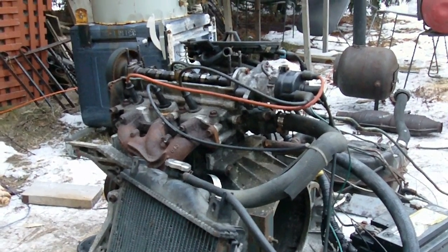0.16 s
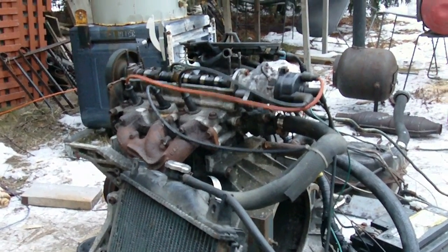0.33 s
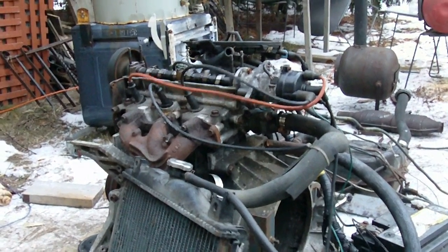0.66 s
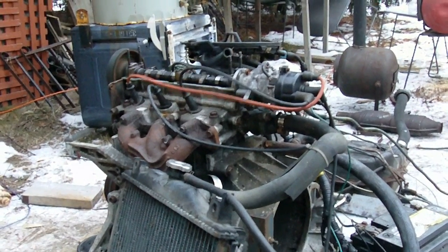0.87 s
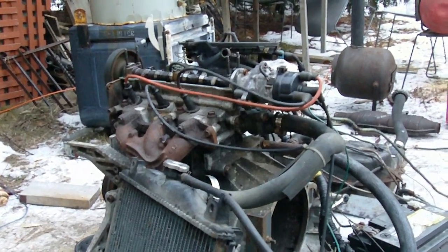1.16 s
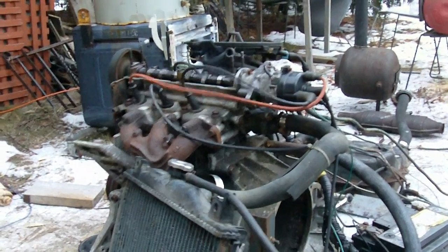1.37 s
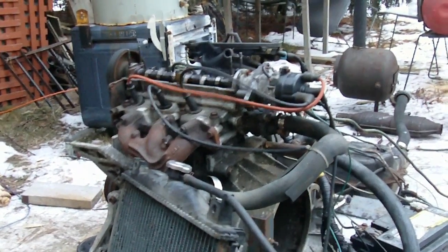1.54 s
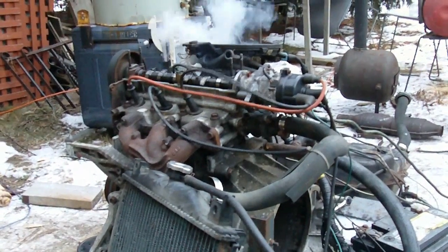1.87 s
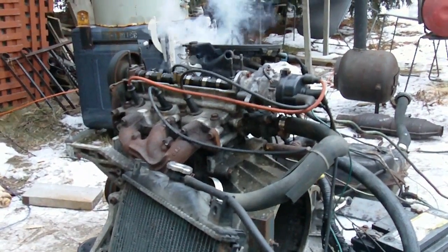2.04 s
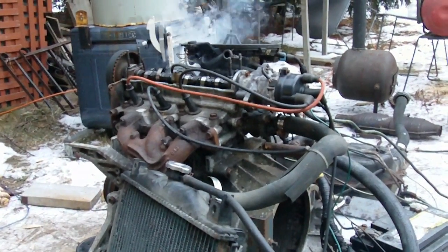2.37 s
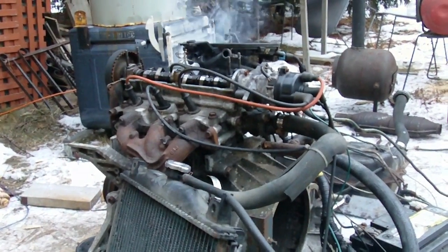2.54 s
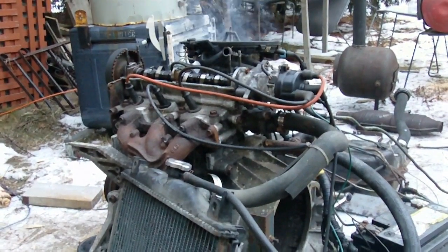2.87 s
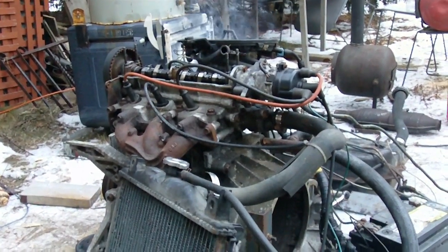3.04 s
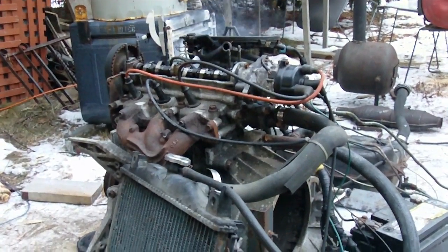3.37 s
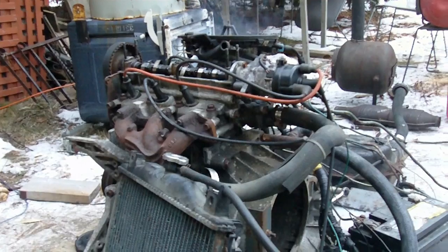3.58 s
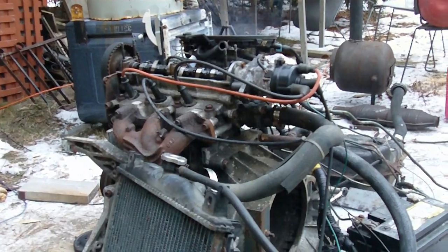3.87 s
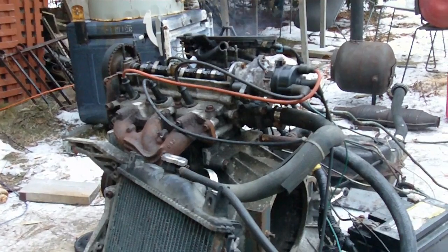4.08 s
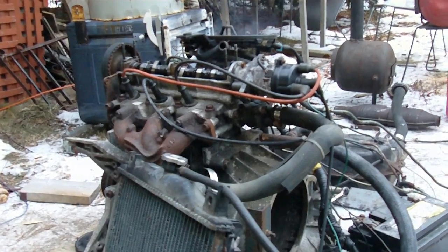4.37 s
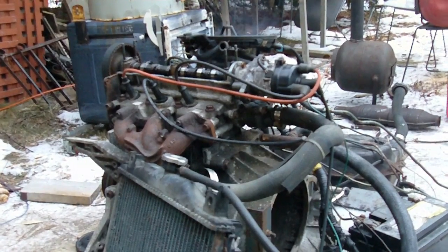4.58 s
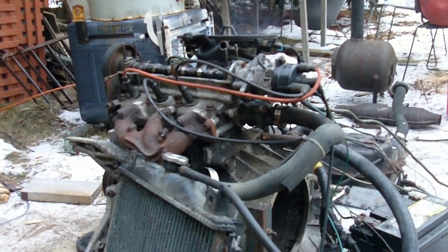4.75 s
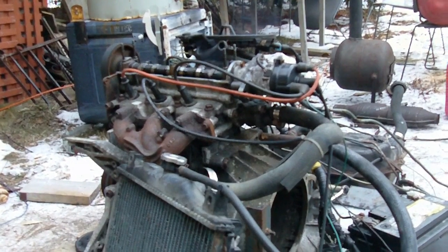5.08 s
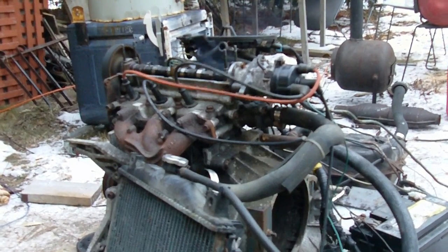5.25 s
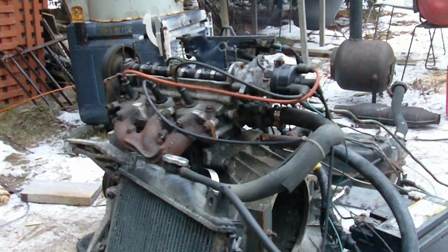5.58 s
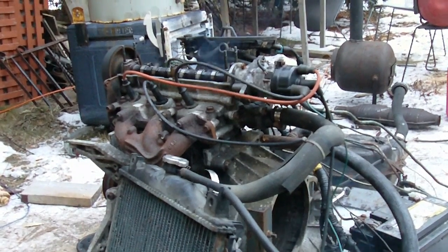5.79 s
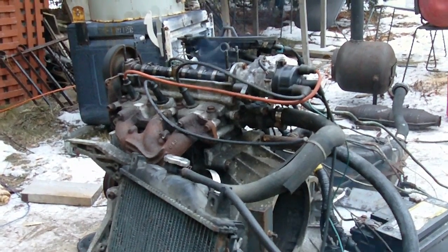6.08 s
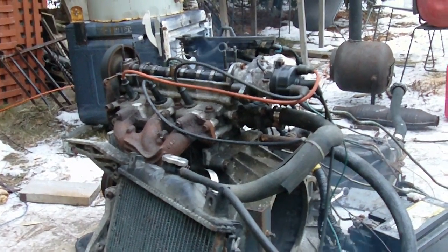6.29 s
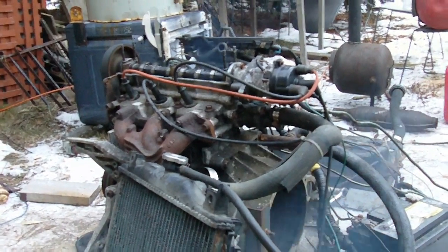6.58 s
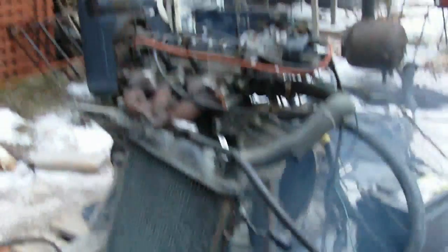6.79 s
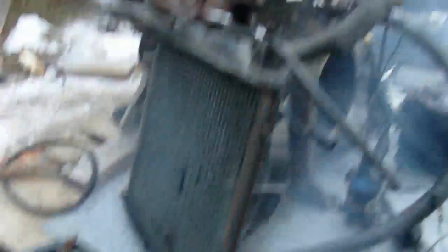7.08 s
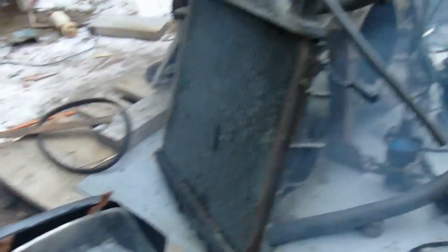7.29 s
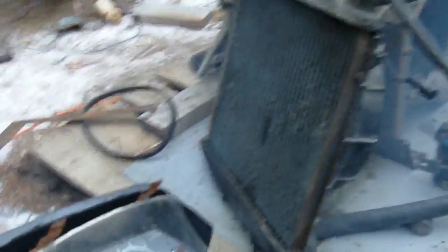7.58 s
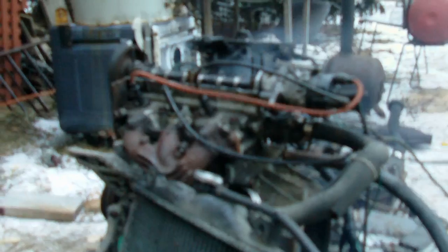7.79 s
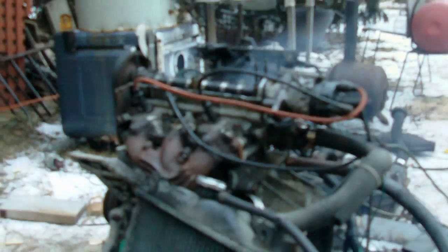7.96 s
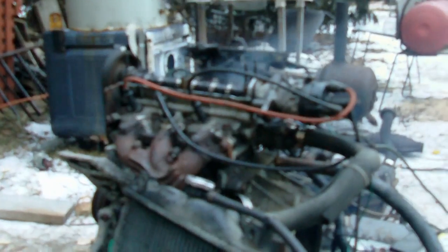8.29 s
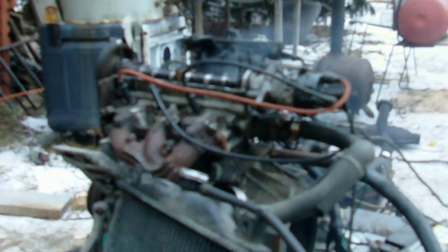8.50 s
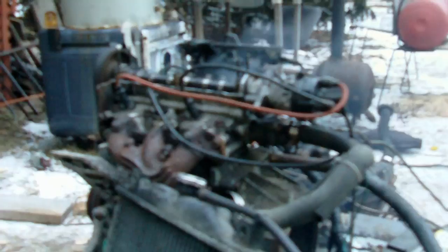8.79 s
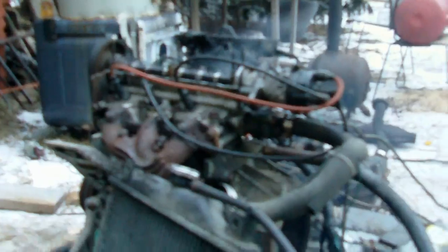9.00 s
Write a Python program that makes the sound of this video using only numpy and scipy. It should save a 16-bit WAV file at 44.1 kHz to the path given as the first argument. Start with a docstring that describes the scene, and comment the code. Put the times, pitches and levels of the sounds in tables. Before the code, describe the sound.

Close by in a quiet yard, an exposed engine is cranked: gears grind, and each slow chug lands with a loud metal clack. The first attempt fails and the starter whirs down to near silence, with a single click. The starter bites again, the chugs quicken and the engine fires, climbing with puffing exhaust and ticking valves. The tone then changes abruptly to a fast, even, clattering idle, as if heard from its other side.

```python
"""A snowy yard, where an open six-cylinder engine is being started. The starter's gears grind and growl,
single cylinders clack and gulp, the engine stalls and the starter spins down. A second try catches and
climbs; from SHIFT_S on it idles faster, heard from another side. Gears and clacks are noise through metal
resonances, the exhaust is a train of puffs coloured by the pipe, and valves tick and ring on every turn.
The sheds throw back a short echo."""
import sys
import numpy as np
from scipy import signal
from scipy.fft import rfft, irfft, next_fast_len
from scipy.io import wavfile
from scipy.ndimage import uniform_filter1d, map_coordinates

SR = 44100
rng = np.random.default_rng(int(sys.argv[2]) if len(sys.argv) > 2 else 0)


def store_pcm(level_fs):
    """Save levels as 16-bit WAV."""
    pcm = np.round(np.clip(level_fs, -1, 1) * 32767).astype(np.int16)
    wavfile.write(sys.argv[1], SR, np.atleast_2d(pcm).T)


N = 402633
T = np.arange(N) / SR
STALL_S, STOP_S, RETRY_S, CATCH_S, SHIFT_S = 1.85, 3.6, 4.538, 6.0, 7.755
SECOND_AT = .32  # the next cylinder follows after this share of the gap between chugs

# flutter of the passing gear teeth: time_s, rate_hz, depth_db
TOOTH_FLUTTER = [(0, 70, .5), (1.85, 65, .5), (2, 65, 1.5), (2.5, 60, 1), (3, 40, 1.5), (3.5, 18, 2.5),
                 (4.5, 70, .5), (9.13, 70, 0)]
# the pinion bites the ring gear: start_s, click_db, grind_db, hiss_db
PINION_BITES = [(.3012, -8, -31, -27), (.5152, -11.5, -33.5, -31.5), (.5576, -15.5, -38, -25.5),
                (.7243, -12, -31, -26.5), (.9004, -14, -32.5, -28.5), (1.0859, -15.5, -43, -31.5),
                (1.2565, -12.5, -40, -28.5), (1.4217, -16, -35, -31), (4.7543, -10.5, -31, -30),
                (4.7729, -10, -36, -23.5), (4.8785, -11.5, -33, -30), (5.0401, -14, -32.5, -35),
                (5.1444, -19, -29, -30.5), (5.2142, -11, -32.5, -25), (5.385, -18, -39, -29),
                (5.53, -22.5, -51, -31), (5.6477, -26.5, -48, -31.5), (5.763, -14, -37, -30)]
# crank position as the engine climbs: time_s, firings_so_far
CLIMB_CRANK = [(6, 4.4), (6.058, 6.45), (6.2, 11.85), (6.3434, 17.85), (6.4788, 23.93), (6.6094, 29.98),
               (6.8591, 42), (7.0975, 54), (7.3301, 66), (7.5588, 78), (7.76, 88.65)]
# resonances of the starter, the engine block and its other side: pitch_hz, width_hz, level_db
STARTER_MODES = [(924, 40, -8.5), (1192, 37, -7.5), (1370, 150, 3.5), (1845, 55, -3), (3110, 68, -5),
                 (4530, 220, -5), (5230, 50, -1), (5830, 42, 1.5), (8600, 41, 4.5), (9400, 120, -2.5)]
BLOCK_MODES = [(1030, 140, 9.5), (3003, 68, 2), (3530, 150, -4), (4330, 47, -3.5), (5030, 470, 1),
               (5610, 65, 2), (6330, 120, -5.5), (7470, 410, -13.5), (8830, 540, -11.5)]
FLANK_MODES = [(990, 54, -14), (2240, 60, 1), (2737, 150, -1.5), (3460, 510, 2), (4280, 320, -1.5),
               (5910, 430, -5.5), (6270, 54, -15.5), (7320, 160, -6), (8760, 640, -5)]
# broad tone of the same three bodies: frequency_hz, level_db
STARTER_EQ = [(35, -46.5), (60, -27.5), (300, -20.5), (500, -11.5), (900, -6.5), (1400, -16.5), (2300, -10),
              (4000, -9), (8700, -7), (16000, -21)]
BLOCK_EQ = [(240, -9.5), (400, -16.5), (666, 0.5), (852, -16), (1070, -11), (1560, -5), (3020, 2.5),
            (6950, 0.5), (8760, 5.5), (16000, -5)]
FLANK_EQ = [(240, -14), (400, -1.5), (789, -11.5), (994, -2.5), (1630, -5), (2710, -5), (3930, -9),
            (4310, -5.5), (8760, -7), (16000, -13.5)]


def amp(db):
    """dB to gain."""
    return 10 ** (np.asarray(db) / 20)


def unit(x):
    """Scale to rms 1."""
    return x / np.sqrt(np.mean(x ** 2) + 1e-20)


def curves(rows):
    """One automation curve for each column after the time."""
    times, *columns = np.transpose(rows)
    return [np.interp(T, times, column) for column in columns]


def during(start_s, end_s, fade_s=.01):
    """A gate with soft edges."""
    return np.clip((T - start_s) / fade_s, 0, 1) * np.clip((end_s - T) / fade_s, 0, 1)


def wobble(rate_hz):
    """A smooth random curve."""
    return map_coordinates(rng.standard_normal(int(N * rate_hz / SR) + 4), [T * rate_hz])


def filtered(x, response):
    """Pass x through a complex frequency response."""
    size = next_fast_len(N + SR // 2)
    return irfft(rfft(x, size) * response(np.fft.rfftfreq(size, 1 / SR)), size)[..., :N]


def noise(response):
    """Filtered white noise."""
    return filtered(rng.standard_normal(N), response)


def colour(points):
    """An EQ curve through (Hz, dB) points on a log axis."""
    points_hz, db = np.transpose(points)
    return lambda hz: amp(np.interp(np.log(hz + 1), np.log(points_hz + 1), db))


def metal(eq, modes, ring_db):
    """A metal body: broad EQ with ringing modes on top, at unity power gain."""
    def response(hz):
        ringing = sum(amp(db + ring_db) * 1j * hz * width / (pitch ** 2 - hz ** 2 + 1j * hz * width + 1)
                      for pitch, width, db in modes)
        gain = colour(eq)(hz) * (1 + ringing)
        return gain / np.sqrt(np.mean(np.abs(gain) ** 2))
    return response


def split(x, crossover_hz=2700):
    """Low and high band of a sound."""
    low = filtered(x, lambda hz: 1 / (1 + (hz / crossover_hz) ** 6))
    return low, x - low


def patchy(x, depth_db):
    """Random gain in patches some 500 Hz by 15 ms: no two blows ring alike."""
    spectrum = signal.stft(x, nperseg=256)[2]
    patches = uniform_filter1d(rng.standard_normal(spectrum.shape), size=3, axis=0)
    patches = uniform_filter1d(patches, size=5, axis=1)
    return signal.istft(spectrum * amp(depth_db * unit(patches)), nperseg=256)[1][:N]


def hump(t, rise_s, fall_s, tail_db, t60_s):
    """A rounded envelope that peaks at t = 0 and leaves a tail."""
    top = np.exp(-(t / np.where(t < 0, rise_s, fall_s)) ** 2)
    return np.where(t < 0, top * (1 + amp(tail_db)), top + amp(tail_db - 60 * np.abs(t) / t60_s))


def beats(cycles, on, pattern_db, scatter_db, jitter_s):
    """One uneven impulse each time cycles passes a whole number."""
    at = np.flatnonzero(np.diff(np.floor(cycles)) * on[1:])
    size_draw, time_draw = rng.standard_normal((len(at), 2)).T
    db = np.take(pattern_db, cycles[at + 1].astype(int), mode="wrap") + scatter_db * size_draw
    at = np.clip(at + (jitter_s * SR * time_draw).astype(int), 0, N - 1)
    return np.bincount(at, amp(db), N)


def yard(level_db=-69.5):
    """The quiet noise floor of the yard."""
    # tone of the ambience: frequency_hz, level_db
    yard_eq = [(15, -35), (30, -15), (100, -13), (180, -8.5), (260, -4.5), (400, -5.5), (800, -4.5),
               (2000, -6), (11000, -9.5), (16000, -9.5)]
    return amp(level_db) * unit(noise(colour(yard_eq)))


def shed_echo(near, level_db=-15.5, t60_s=.11):
    """A short diffuse reflection off the sheds."""
    t = np.arange(SR // 3) / SR
    tail = unit(rng.standard_normal(len(t)) * amp(-60 * t / t60_s)) / np.sqrt(len(t))
    return amp(level_db) * signal.fftconvolve(near, tail)[:N]


def hum(pitch_hz=71.8, partial_db=-91, switch_off_s=3.86):
    """Faint electric hum, harmonics 3 to 6, from the stall until the switch clicks."""
    partials = sum(np.sin(2 * np.pi * k * pitch_hz * T) for k in range(3, 7))
    return during(STALL_S, switch_off_s) * amp(partial_db) * np.sqrt(2) * partials


def buzz(pitch_hz=1390, width_hz=190):
    """While the starter coasts, each passing tooth shakes a loose part with one narrow resonance."""
    # swell of the loose part: time_s, level_db
    swell = [(1.9, -79), (1.97, -56), (2.2, -49), (2.3, -53), (2.45, -49), (2.47, -54)]
    rate_hz, _ = curves(TOOTH_FLUTTER)
    shake = amp(7.7 * np.sin(2 * np.pi * np.cumsum(rate_hz) / SR) + 1.8 * wobble(25))
    band = lambda hz: (1j * hz * width_hz / (pitch_hz ** 2 - hz ** 2 + 1j * hz * width_hz)) ** 2
    ring = filtered(shake * rng.standard_normal(N), band)
    return during(swell[0][0], swell[-1][0]) * amp(curves(swell)[0]) * unit(ring)


def growl():
    """The pinion strains against compression: each tooth strikes the starter's body at a wavering rate."""
    # strain on the pinion, one list a try: time_s, tooth_rate_hz, level_db
    strains = [
        [(.1, 420, -50), (.15, 460, -36), (.2, 420, -33), (.24, 500, -39), (.28, 330, -53)],
        [(4.6, 390, -48), (4.67, 455, -34), (4.73, 490, -44), (4.81, 460, -26), (4.84, 460, -36),
         (4.88, 460, -46)],
    ]
    body = metal(STARTER_EQ, STARTER_MODES, ring_db=9)
    out = np.zeros(N)
    for rows in strains:
        rate_hz, db = curves(rows)
        teeth = np.cumsum(rate_hz * (1 + .015 * wobble(60))) / SR
        on = (T > rows[0][0]) & (T < rows[-1][0])
        strikes = beats(teeth, on, [0], scatter_db=2, jitter_s=.00004)
        ring = filtered(strikes, lambda hz: body(hz) / (1 + (hz / 3600) ** 4))
        out += on * amp(db) * ring / np.std(ring[on])
    return out


def starter_load(rise_s=.012, grind_fall_db_per_s=174.5, hiss_fall_db_per_s=111.5):
    """Gains of grind and hiss while cranking: the load plus a short surge after every pinion bite."""
    # the starter under load, one list a try: time_s, grind_db, hiss_db
    loads = [
        [(0, -36, -29), (.05, -28, -38.5), (.09, -40.5, -33), (.2, -34, -26.5), (.25, -28, -32),
         (.3, -43, -30.5), (.5, -46, -37.5), (1, -47, -36), (1.5, -48, -43), (1.9, -47, -42.5)],
        [(4.535, -33, -24.5), (4.6, -32, -34.5), (4.67, -32, -28), (4.75, -39, -30.5), (4.82, -23, -24),
         (4.87, -32.5, -31.5), (4.91, -36, -22.5), (4.97, -43.5, -40), (5.1, -46, -34.5), (5.5, -44, -34.5),
         (5.84, -41, -30.5), (5.88, -42.5, -48.5), (6.05, -45, -33)],
    ]
    first_try, second_try = map(curves, loads)
    power = amp(np.where(T < STOP_S, first_try, second_try)) ** 2
    t = np.arange(SR // 4) / SR
    for start_s, _, grind_db, hiss_db in PINION_BITES:
        decay = amp([grind_db - grind_fall_db_per_s * t, hiss_db - hiss_fall_db_per_s * t])
        power[:, round(start_s * SR):][:, :len(t)] += (np.clip(t / rise_s, 0, 1) * decay) ** 2
    return np.sqrt(power)


def whirr():
    """Starter gears grind under load and hiss while coasting; then the engine's rush takes over."""
    # resonances of the coasting starter: pitch_hz, width_hz, level_db
    coast_modes = [(910, 37, -6.5), (1430, 110, -5.5), (1850, 55, -5.5), (2274, 67, -9.5), (3170, 90, -8.5),
                   (5040, 41, -1.5), (5260, 40, 2), (6170, 98, -6.5), (7550, 110, -2.5), (8580, 190, -4),
                   (9410, 180, -3), (10500, 98, -0.5), (12140, 280, -10.5)]
    # its broad tone: frequency_hz, level_db
    coast_eq = [(35, -55), (60, -27), (400, -22), (900, -16.5), (2000, -18.5), (3900, -10.5), (4500, -6),
                (5600, -7), (9350, -7.5), (16000, -20)]
    # fade of the coasting starter, and rush of the running engine: time_s, low_db, high_db
    spin_down = [(1.8, -50.5, -44.5), (2.1, -49.5, -44.5), (2.45, -48.5, -40), (2.5, -52.5, -40),
                 (2.9, -54.5, -44.5), (3.1, -57, -48), (3.35, -65, -56.5), (3.46, -69, -63),
                 (3.5, -75, -72)]
    rush = [(6, -39, -41), (6.7, -37.5, -37.5), (7, -33, -34), (7.7, -40, -41.5), (7.76, -35.5, -33),
            (8.8, -38.5, -36), (9.13, -33, -30.5)]
    cranking = during(-1, STALL_S + .05, .1) + during(RETRY_S, CATCH_S + .05, .003)
    coasting = during(STALL_S - .05, STOP_S, .1)
    climbing, idling = during(CATCH_S, SHIFT_S + .01), during(SHIFT_S, 10)
    stages = [(cranking, metal(STARTER_EQ, STARTER_MODES, ring_db=8), starter_load(), 2.5),
              (coasting, metal(coast_eq, coast_modes, ring_db=6.5), amp(curves(spin_down)), 1.2),
              (climbing, metal(BLOCK_EQ, BLOCK_MODES, ring_db=1.5), amp(curves(rush)), 2.5),
              (idling, metal(FLANK_EQ, FLANK_MODES, ring_db=-1.3), amp(curves(rush)), 2.2)]
    out = np.zeros(N)
    for on, body, (low_gain, high_gain), patch_db in stages:
        low, high = split(patchy(noise(body), patch_db))
        shake = amp(.43 * patch_db * wobble(55))
        grind = unit(low) * low_gain * amp(1.3 * wobble(40))
        out += on * shake * (grind + unit(high) * high_gain)
    rate_hz, depth_db = curves(TOOTH_FLUTTER)
    return out * amp(depth_db * np.sin(2 * np.pi * np.cumsum(rate_hz) / SR))


def pings(attack_s=.003):
    """Single parts ring on after a blow, each at one pitch with a flickering level."""
    # struck parts: start_s, level_db, pitch_hz, t60_s
    strikes = [(.048, -27, 5945, 0.28), (.116, -29.5, 6000, 0.33), (.14, -28, 3100, 0.22),
               (.727, -28.5, 5945, .15), (1.672, -32.5, 2010, 0.11), (6.034, -27, 2600, .1),
               (6.058, -15, 2010, 0.08)]
    out, t = np.zeros(N + SR), np.arange(SR // 4) / SR
    for start_s, db, pitch_hz, t60_s in strikes:
        envelope = amp(db - 60 * t / t60_s) * (1 - np.exp(-t / attack_s))
        out[round(start_s * SR):][:len(t)] += envelope * np.sin(2 * np.pi * pitch_hz * t)
    return out[:N] * (1 + .2 * wobble(130))


def chugs():
    """Each chug of the cranking engine with its gap_s to the next; a try's last repeats the gap before."""
    # pairs of cylinder strokes, one list a try:
    # start_s, clack_db, second_clack_db, gulp_db, second_gulp_db, second_gulp_end_hz
    tries = [
        [(.3361, 3.5, -15.5, -43, -43, 212), (.5846, 2.5, -4.5, -36, -30.5, 318),
         (.7687, 2.5, -25, -39, -44, 205), (.9552, 2, -30, -42, -53, 218), (1.1293, 1, -21, -42, -54, 200),
         (1.297, 1.5, -27, -41, -55, 200), (1.4596, 1, -34, -35, -46, 213), (1.61, 2, -29, -39, -37.5, 320),
         (1.7539, 2.5, -24.5, -39, -45, 210)],
        [(4.9279, 5, -36, -42, -56, 195), (5.2392, 2.5, -7.5, -34, -36, 217),
         (5.4103, 2.5, -7.5, -36, -37, 237), (5.5509, 0.5, -10.5, -38, -40, 233),
         (5.6727, -0.5, -7.5, -33, -39, 241), (5.7819, 0.5, -10, -37, -34, 264),
         (5.8822, 0, -10.5, -36, -38, 232), (5.9735, 1, -14, -33, -36, 240)],
    ]
    for rows in tries:
        gaps_s = np.diff([row[0] for row in rows])
        yield from zip(rows, np.pad(gaps_s, (0, 1), "edge"))


def gulps(low_hz=109, high_hz=250, lag_s=.0033, gas_db=-57):
    """At cranking speed each exhaust stroke sounds alone: a short hollow tone that slides and shakes."""
    # lone gulps of a crank that barely turns: start_s, level_db, length_s, start_hz, end_hz
    lone_gulps = [(.19, -47, .097, 93, 125), (1.876, -47, 0.098, 110, 223), (1.933, -51, 0.14, 108, 204),
                  (2.035, -57, .063, 119, 105), (2.16, -51, .059, 190, 155), (4.802, -49, 0.14, 97, 129)]
    # gas rushing in the pipe between gulps: frequency_hz, level_db
    gas_eq = [(40, -25.5), (90, -6), (180, 1), (300, -1.5), (450, -30.5), (2000, -91)]
    strokes, out, flutter = list(lone_gulps), np.zeros(N + SR), wobble(120)
    for (start_s, _, _, db, second_db, end_hz), gap_s in chugs():
        strokes.append((start_s + lag_s, db, .31 * gap_s, low_hz, high_hz))
        strokes.append((start_s + SECOND_AT * gap_s, second_db, .34 * gap_s, low_hz, end_hz))
    for start_s, db, length_s, start_hz, end_hz in strokes:
        at, count = round(start_s * SR), round(length_s * SR)
        progress = np.arange(count) / (length_s * SR)
        glide_hz = start_hz + (end_hz - start_hz) * progress ** .75
        phase = 2 * np.pi * np.cumsum(glide_hz * (1 + .05 * flutter[at:][:count])) / SR
        envelope = amp(db) * np.sin(np.pi * progress ** 1.5) ** .8
        out[at:][:count] += envelope * (np.sin(phase) + .16 * np.sin(2 * phase))
    cranking = during(.1, STALL_S + .25, .2) + during(RETRY_S, CATCH_S, .1)
    gas = amp(gas_db) * cranking * unit(noise(colour(gas_eq)))
    return gas + out[:N] * (1 + .3 * wobble(110))


def blows(scatter_db=1.5):
    """Cue list of firings, accents, bites, chugs and ticks: start_s, level_db, knock_offset_db."""
    # clack of each cylinder during the climb: time_s, then six level_db in firing order
    cylinder_clacks = [(6, 1.5, -34, -7.5, -33, -11.5, -4.5), (6.75, -2, -26.5, -9.5, -29.5, -20.5, -5.5),
                       (6.95, -9, -19, -6, -12.5, -11.5, -3), (7.2, -22, -15, -5.5, 0, -28, -8.5),
                       (7.6, -15, -20, -4, -22.5, -28, -4), (7.76, -16, -29, -2, -19, -27, -23)]
    # loud single clacks (starter engaging, accented firings, uneven knocks at idle): start_s, level_db
    accents = [(.006, -10), (0.0184, 0.5), (0.0307, -2), (4.5423, -12.5), (4.5548, 1), (6.2156, -15.5),
               (7.1665, -7), (7.3181, -7.5), (7.3945, -10), (7.4524, -1.5), (7.4892, -12), (7.6813, -11.5),
               (7.7372, -5), (7.8062, -12), (7.865, -10.5), (7.909, -10), (7.939, -11), (7.9749, -8),
               (8.0117, -9), (8.115, -8), (8.1316, -13), (8.2345, -9), (8.285, -10.5), (8.3724, -5.5),
               (8.5464, -8.5), (8.6418, -10), (8.6837, -6.5), (8.752, -11.5), (8.848, -9.5), (8.889, -10),
               (8.9531, -9.5), (9.0573, -8)]
    # weight of the low knock under a clack: time_s, knock_offset_db
    knock_weight = [(0, -15.5), (1, -19), (1.8, -21), (4.5, -15), (6.2, -18), (6.8, -13.5), (7.7, -16),
                    (7.8, -12), (9.13, -14)]
    # light ticks while nothing fires: start_s, level_db, knock_offset_db
    light_ticks = [(1.9303, -30, -16), (2.0, -33, -11), (2.032, -27, -29), (2.152, -28, -16),
                   (2.2101, -24.5, -17), (2.2545, -26, -19), (2.2999, -25, -17), (2.3802, -30, -21),
                   (2.3962, -23.5, -18), (2.4296, -24, -17), (2.768, -30.5, -9), (2.9905, -35.5, -5),
                   (3.0612, -35, -7), (3.2148, -37.5, -18), (3.3485, -45.5, -16), (3.4556, -46, -16),
                   (3.581, -61, 3), (3.865, -22.5, -17), (4.0796, -56, -4), (4.2495, -58, -1),
                   (4.4196, -55, -14.5), (4.4416, -58, -9.5), (4.4785, -54, -21)]
    times_s, firings = np.transpose(CLIMB_CRANK)
    firing = np.arange(5, int(firings[-1]))
    clack_s = np.interp(firing + .45, firings, times_s)  # nearly halfway to the next firing
    clack_db = np.array(curves(cylinder_clacks))[firing % 6, (clack_s * SR).astype(int)]
    clack_db += scatter_db * rng.standard_normal(len(firing))
    hits = list(zip(clack_s, clack_db)) + accents + [bite[:2] for bite in PINION_BITES]
    for (start_s, db, second_db, *_), gap_s in chugs():
        hits += [(start_s, db), (start_s + SECOND_AT * gap_s, second_db)]
    knock_db, = curves(knock_weight)
    return [(start_s, db, knock_db[round(start_s * SR)]) for start_s, db in hits] + light_ticks


def clacks():
    """Each clack is a few milliseconds of rattling metal; its low knock leads a little."""
    # metal struck before the engine catches: pitch_hz, width_hz, level_db
    clack_modes = [(1106, 110, 3.5), (1960, 37, -3), (3000, 77, -4), (4430, 67, -13.5), (8330, 150, -4.5),
                   (9610, 1000, -10.5)]
    # tone of the cranking clacks and of the light ticks: frequency_hz, level_db
    clack_eq = [(18, -38.5), (30, -13), (780, -9), (1010, -10), (1500, -8), (1960, -3), (2290, -1.5),
                (3310, -3.5), (4420, 2), (6550, -1), (8520, 0.5), (16000, -9)]
    tick_eq = [(30, -42), (300, -12), (900, -15), (2000, -1.5), (5000, -4.5), (9500, -0.5), (16000, -10)]
    t = np.arange(-400, SR // 6) / SR
    cranking_burst = hump(t, rise_s=.0035, fall_s=.0043, tail_db=-10, t60_s=.1)
    running_burst = hump(t, rise_s=.0021, fall_s=.0035, tail_db=-9.5, t60_s=.1)
    knock, crack, pad = np.zeros(N + SR), np.zeros(N + SR), len(t)
    for start_s, db, knock_db in blows():
        burst = running_burst if start_s > CATCH_S else cranking_burst
        knock[pad + round((start_s + .0012 + t[0]) * SR):][:len(t)] += amp(db + knock_db - 7.5) * burst
        crack[pad + round((start_s + .0025 + t[0]) * SR):][:len(t)] += amp(db - 13.5) * burst
    resting = (T > STALL_S + .05) & (T < RETRY_S - .02)
    stages = [((T < CATCH_S) & ~resting, clack_eq, clack_modes),
              (resting, tick_eq, clack_modes),
              ((T >= CATCH_S) & (T < SHIFT_S), BLOCK_EQ, BLOCK_MODES),
              (T >= SHIFT_S, FLANK_EQ, FLANK_MODES)]
    out = np.zeros(N)
    for on, eq, modes in stages:
        body = metal(eq, modes, ring_db=4.73)
        band_rms = np.std(split(noise(body)), axis=1)
        for band, envelope in enumerate([knock, crack]):  # knock in the low band, crack in the high
            rattle = filtered(on * envelope[pad:][:N] * rng.standard_normal(N), body)
            out += split(rattle)[band] / band_rms[band]
    return patchy(out, depth_db=3)


def valve_rings(firings, on, valves, attack_s=.0014):
    """Once a turn (three firings) each of these valves is struck and rings briefly at its own pitch."""
    out, t = np.zeros(N), np.arange(SR // 20) / SR
    for place, pitch_hz, db, t60_s in valves:
        strikes = beats((firings - place + 3) / 3, on, [db], scatter_db=3, jitter_s=.0005)
        ring = amp(-60 * t / t60_s) * (1 - np.exp(-t / attack_s)) * np.sin(2 * np.pi * pitch_hz * t)
        out += signal.fftconvolve(strikes, ring)[:N]
    return patchy(out, depth_db=3)


def valve_clatter(firings, on, ticks, body):
    """Valves tick at set places of each turn: short noise bursts through the engine's metal."""
    taps = sum(beats((firings - place + 3) / 3, on, [db], scatter_db=1.5, jitter_s=.0004)
               for place, db in ticks)
    t = np.arange(SR // 20) / SR
    tick = hump(t - t[300], rise_s=.0024, fall_s=.0032, tail_db=-16, t60_s=.04)
    envelope = signal.fftconvolve(taps, tick)[300:][:N]
    return patchy(filtered(envelope * rng.standard_normal(N), body), depth_db=2.5)


def exhaust_puffs(firings, on, pipe_eq):
    """Six firings in two turns puff through the pipe; each gas slug speeds up, so its pitch rises."""
    # strength of the cylinders in firing order: level_db
    cylinder_db = [0, -1.5, -.5, 1, -2, -1]
    t = np.arange(SR // 20) / SR
    chirp = np.sin(2 * np.pi * (90 * t + 2500 * t ** 2)) * amp(-60 * t / .07)
    sweep = rfft(chirp, next_fast_len(N + SR // 2))
    sweep /= np.abs(sweep + 1e-9)  # phase only: the pipe sets the tone
    pulses = beats(firings, on, cylinder_db, scatter_db=1.6, jitter_s=.0002)
    return filtered(pulses, lambda hz: colour(pipe_eq)(hz) * sweep)


def engine(crank, mix, pipe_eq, ticks, valves, body, breath):
    """The running engine: breathy exhaust, valve clatter and valve rings, all timed by the crank."""
    exhaust_gain, clatter_gain, ring_gain = amp(curves(mix))
    on = (T >= mix[0][0]) & (T < mix[-1][0])
    firings, = curves(crank)
    levelled = lambda x: on * x / np.std(x[on])
    puffs = levelled(exhaust_puffs(firings, on, pipe_eq))
    exhaust = levelled(puffs + breath * levelled(noise(colour(pipe_eq))))
    clatter = levelled(valve_clatter(firings, on, ticks, body))
    return exhaust_gain * exhaust + clatter_gain * clatter + ring_gain * valve_rings(firings, on, valves)


def engine_climb():
    """The engine catches and gathers speed."""
    # balance of the layers: time_s, exhaust_db, clatter_db, ring_db
    mix = [(6.0, -40, -38, -27), (6.494, -34.5, -32, -21), (7.2, -32.5, -34, -21.5),
           (7.69, -35, -41, -16.5), (7.76, -30.5, -25, -16)]
    # tone of the exhaust pipe: frequency_hz, level_db
    pipe_eq = [(30, -23), (70, -22), (100, -13.5), (150, -1.5), (200, 2), (260, -1), (330, -3.5),
               (390, -6.5), (450, -19), (650, -13.5), (900, -34), (2000, -90)]
    # valve ticks in one turn: place_firings, level_db
    ticks = [(.1, -3.5), (.55, 0), (1.25, 4.5), (1.55, 1), (2.2, 0.5), (2.55, -1)]
    # ringing valves: place_firings, pitch_hz, level_db, t60_s
    valves = [(2.5, 4880, 2.5, .035), (2.5, 2990, -8, .04), (2.5, 1040, -9, .04)]
    body = metal(BLOCK_EQ, BLOCK_MODES, ring_db=5)
    return engine(CLIMB_CRANK, mix, pipe_eq, ticks, valves, body, breath=.5)


def engine_idle():
    """A fast, even idle, heard from the engine's other side."""
    # crank position: time_s, firings_so_far
    crank = [(7.76, 0), (7.9642, 12), (8.5794, 47.67), (9.13, 79.87)]
    # balance of the layers: time_s, exhaust_db, clatter_db, ring_db
    mix = [(7.761, -29.5, -27.5, -20), (9.03, -30, -26.5, -18.5), (9.13, -28.5, -23, -13)]
    # tone of the exhaust pipe: frequency_hz, level_db
    pipe_eq = [(30, -50), (70, -32), (116, -13.5), (175, -0.5), (233, -5), (291, 1.5), (350, -7),
               (408, -10), (470, -37), (620, -8.5), (900, -27), (2000, -90)]
    # valve ticks in one turn: place_firings, level_db
    ticks = [(.2, -3.5), (.55, -3), (.83, 5.5), (1.2, -8), (1.58, 3), (1.9, -8.5), (2.52, 0), (2.88, 3)]
    # ringing valves: place_firings, pitch_hz, level_db, t60_s
    valves = [(.45, 2690, -1, 0.033), (.68, 4330, -4.5, 0.028), (1.55, 1043, -4.5, 0.031),
              (2.48, 2700, -9, 0.023), (2.62, 1040, -5.5, .04), (2.7, 4380, -8, 0.042)]
    body = metal(FLANK_EQ, FLANK_MODES, ring_db=.4)
    return engine(crank, mix, pipe_eq, ticks, valves, body, breath=.45)


def scene():
    """The engine and its echo over the yard's floor and the starter's noises, in mono."""
    near = clacks() + pings() + gulps() + engine_climb() + engine_idle()
    return (near + shed_echo(near) + yard() + whirr() + buzz() + growl() + hum())[None]


def record(dry):
    """A small microphone loses the deep bass, rounds off the loudest clacks and cuts the very top."""
    low_cut_hz, top_hz = 45, 15800
    thinned = filtered(dry, lambda hz: 1j * hz / (low_cut_hz + 1j * hz))
    saturated = thinned / (1 + np.abs(thinned) ** 6) ** (1 / 6)
    band_limited = filtered(saturated, lambda hz: np.clip((top_hz - hz) / 100 + .5, 0, 1) ** 2)
    return np.clip(band_limited, -1, 1)


dry = scene()
out = record(dry)
store_pcm(out)
```